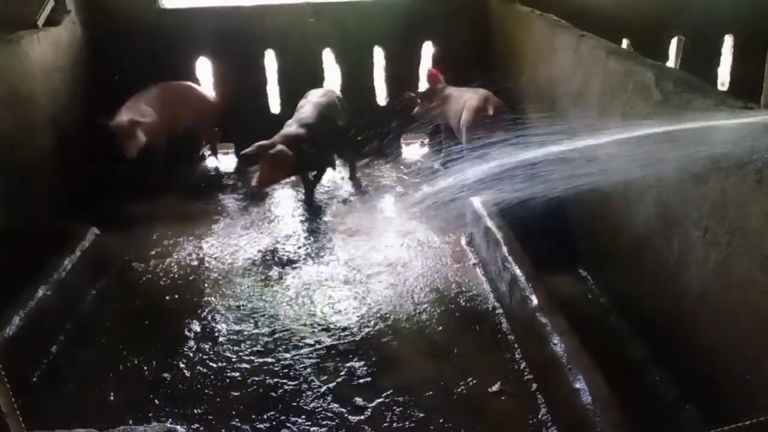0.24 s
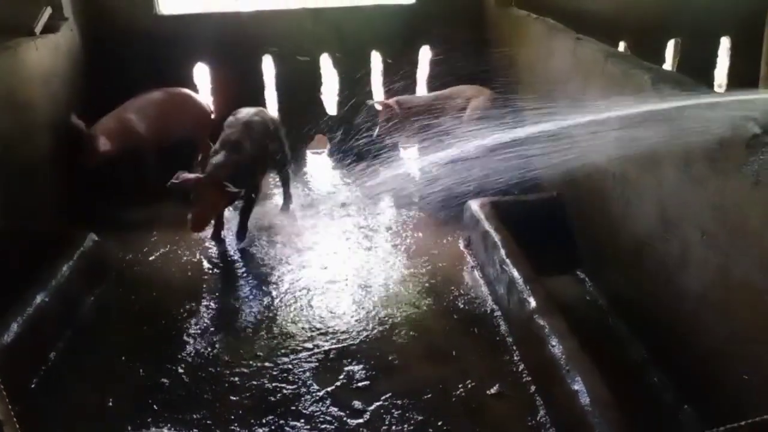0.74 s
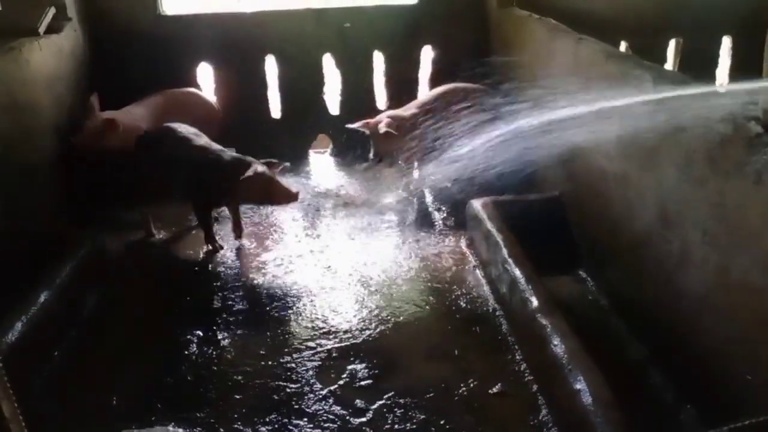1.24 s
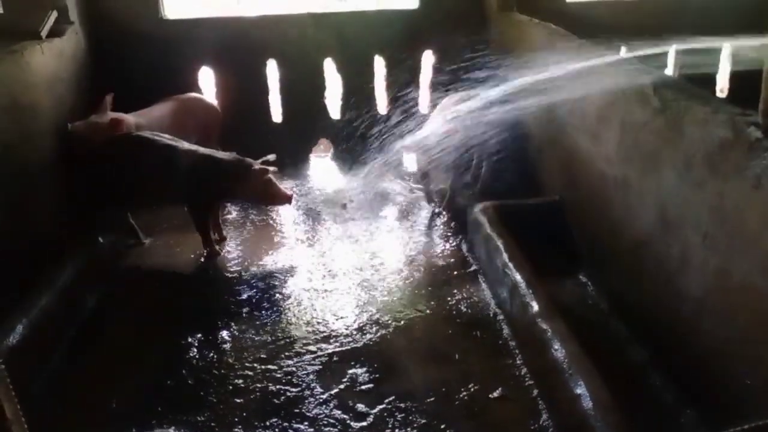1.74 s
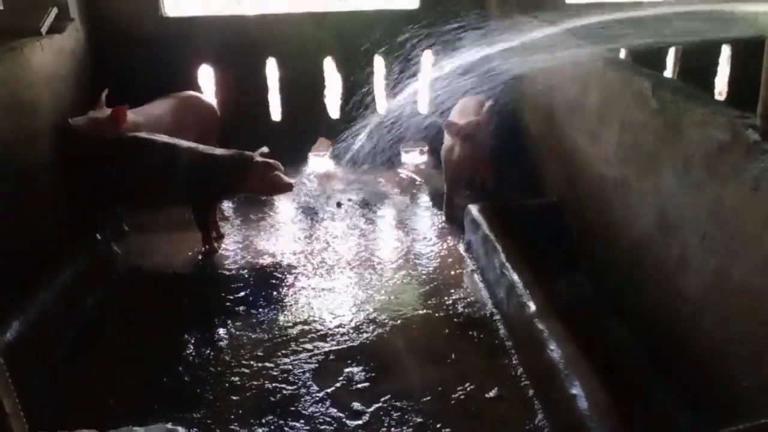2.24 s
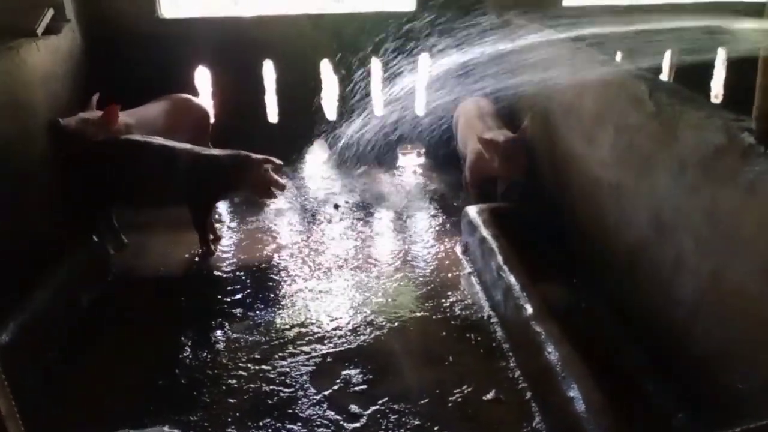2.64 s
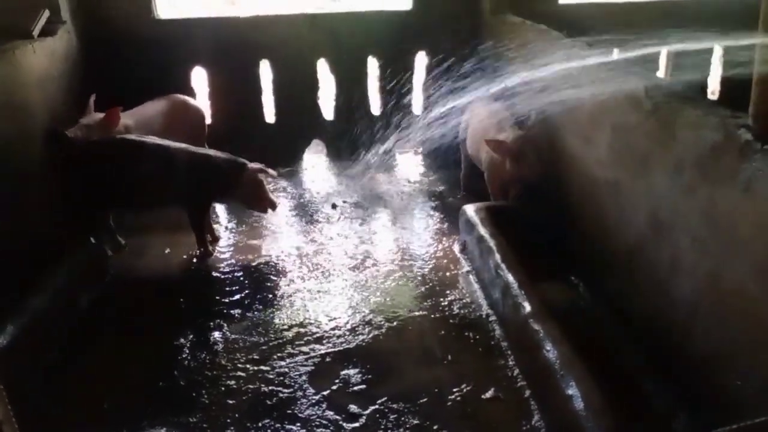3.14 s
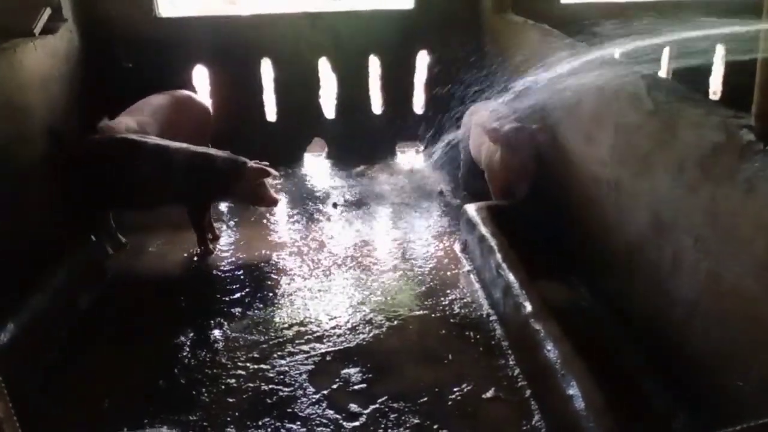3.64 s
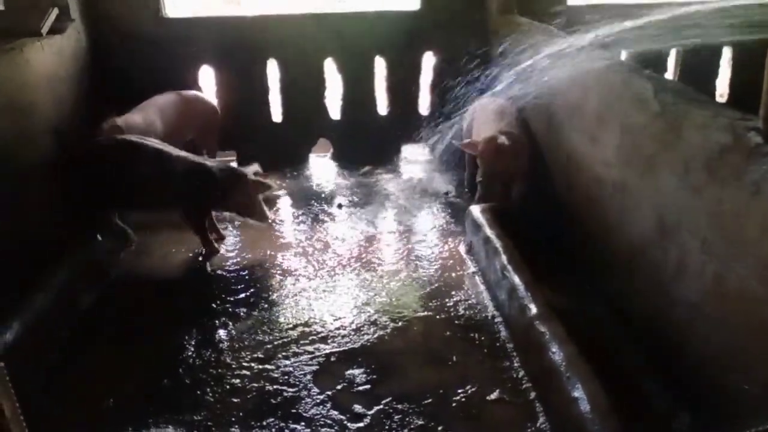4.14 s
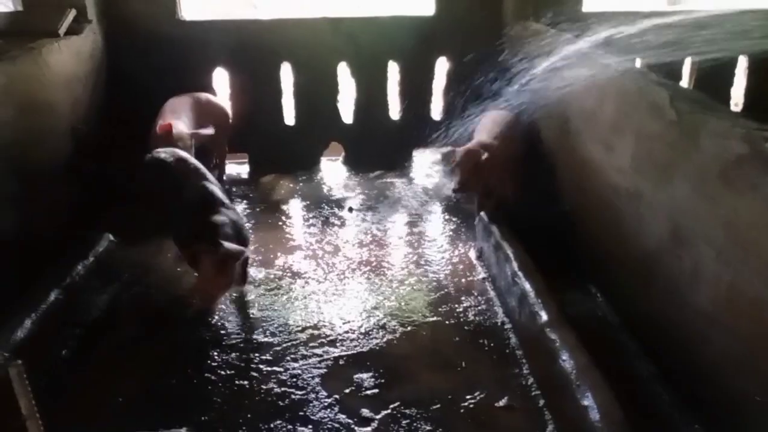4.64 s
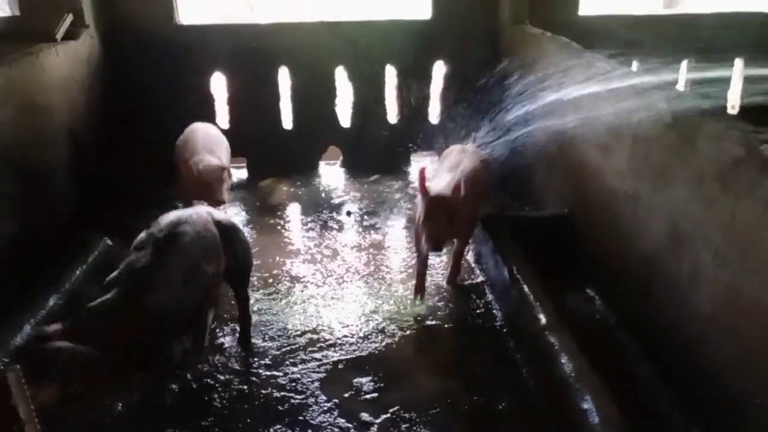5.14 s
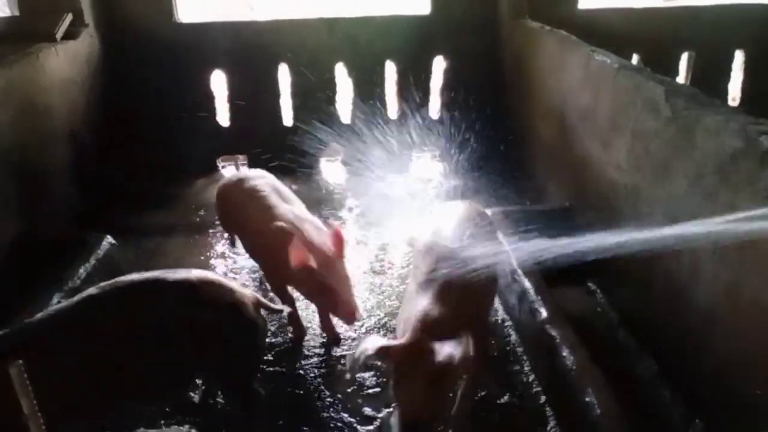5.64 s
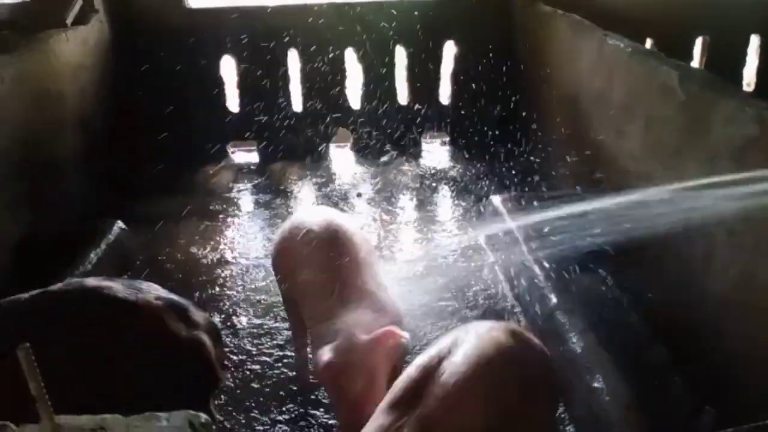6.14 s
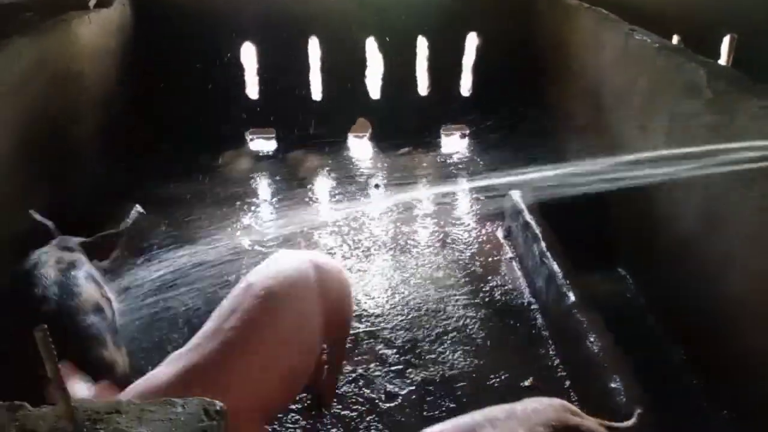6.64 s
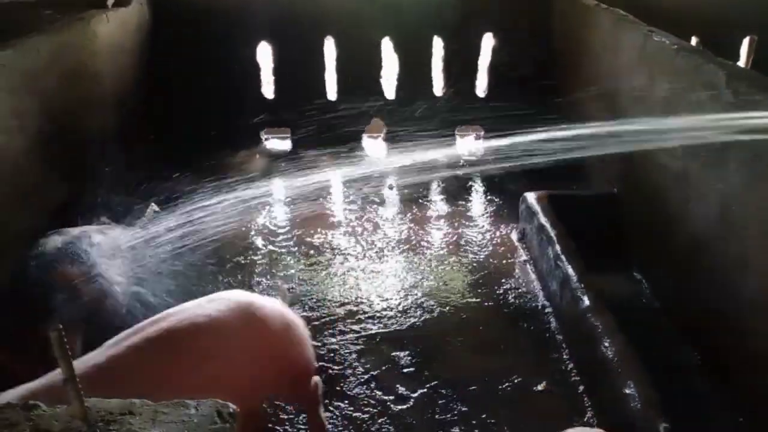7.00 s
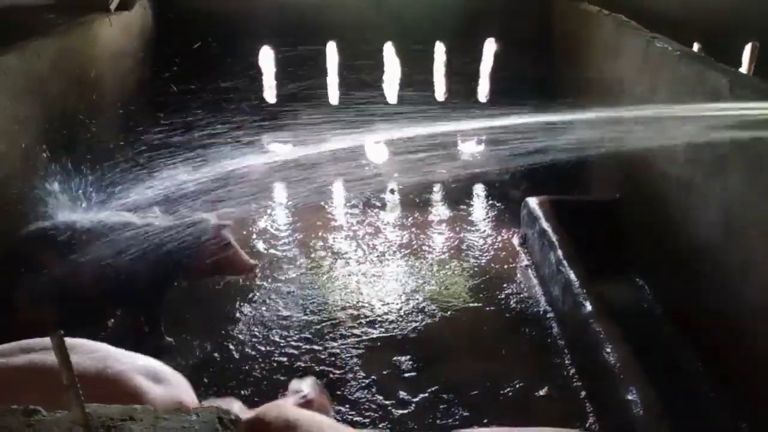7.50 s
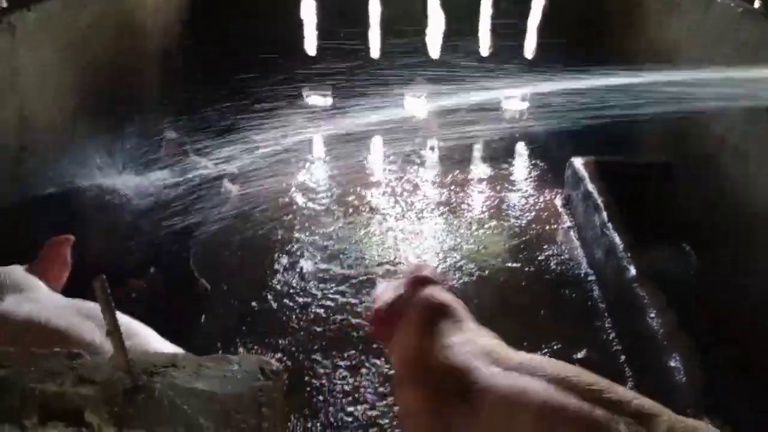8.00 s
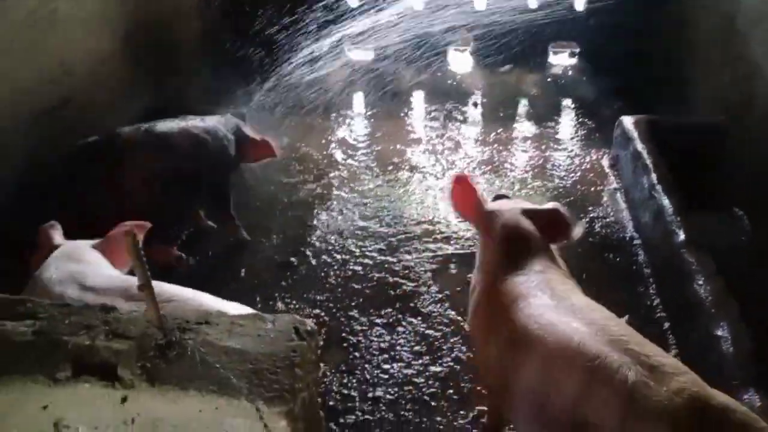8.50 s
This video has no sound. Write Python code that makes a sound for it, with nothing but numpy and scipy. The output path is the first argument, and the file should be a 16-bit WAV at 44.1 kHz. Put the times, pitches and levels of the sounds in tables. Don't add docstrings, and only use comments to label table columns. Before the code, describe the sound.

Steady spraying water on wet concrete, with splashy hoofsteps, dull knocks, two short pig grunts, faint nasal moans and a late burst of wet flapping.

```python
import sys
import numpy as np
from scipy import signal
from scipy.fft import rfft, irfft, next_fast_len
from scipy.io import wavfile
from scipy.ndimage import uniform_filter1d

SR = 44100
rng = np.random.default_rng(int(sys.argv[2]) if len(sys.argv) > 2 else 0)


def unload_audio(sound):
    columns = np.transpose(np.atleast_2d(sound))
    steps = np.round(np.clip(columns, -1, 1) * 32767)
    wavfile.write(sys.argv[1], SR, steps.astype(np.int16))


def volts(x):
    e = np.asarray(x, float) / 20
    return 10 ** e


N = 386316
STEP = 64


def evened(x):
    return x / np.sqrt(np.mean(x ** 2) + 1e-20)


def read(points, hz):
    f, value = np.transpose(points)
    return np.interp(np.log(hz + 1), np.log(f + 1), value)


def played(rows, t):
    s, *columns = np.transpose(rows)
    return [np.interp(t, s, c) for c in columns]


def add(mix, s, sound):
    part = mix[round(s * SR):][:len(sound)]
    part += sound[:len(part)]


def resonate(x, hz, width_hz):
    r = np.exp(-np.pi * width_hz / SR)
    if np.isscalar(hz):
        return 2 * signal.lfilter([1 - r], [1, -r * np.exp(2j * np.pi * hz / SR)], x).real
    turn = np.exp(2j * np.pi * np.cumsum(hz) / SR)
    return 2 * (turn * signal.lfilter([1 - r], [1, -r], x / turn + 1e-18)).real


def coloured(x, spectrum):
    size = next_fast_len(len(x))
    gain = volts(read(spectrum, np.fft.rfftfreq(size, 1 / SR)))
    return irfft(rfft(x, size) * gain, size)[:len(x)]


def lumpy(patchy_db, flicker_db):
    size = 512
    frames = 4 * N // size + 5
    a, b, patches = rng.standard_normal((frames, size // 2 + 1, 3)).T
    patches = evened(uniform_filter1d(uniform_filter1d(patches, size=6, axis=0), size=12, axis=1))
    gusts = signal.lfilter([1], [1, -0.8], rng.exponential(1, frames) ** 1.16)
    gusts = evened(gusts - gusts.mean()).clip(-3, 4)
    z = (a + 1j * b) * volts(patchy_db * patches + flicker_db * gusts)
    return evened(signal.istft(z, nperseg=size, noverlap=3 * size // 4)[1][:N])


def drops(per_s, spread_db):
    chance, size = rng.random((N, 2)).T
    sign = np.sign(rng.standard_normal(N))
    strength = volts(spread_db * np.minimum(-np.log(size + 1e-9), 4))
    return evened((chance < per_s / SR) * sign * strength)


def peaked(t, s, rise_s, fall_s):
    return np.where(t < s, (s - t) / rise_s, (t - s) / fall_s)


def jet(t):
    # time in seconds, force of the jet in dB,
    # depth of the water it lands in and fineness of the nozzle spray, both in dB over the force.
    aim = [(0.0, -26.5, -7.5, -5.5), (1.1, -24, -5, -9.5), (1.3, -25.5, -8, -6.5), (1.85, -27, -7, -7.5),
           (2.0, -30, 5, -5), (2.35, -28, 0.5, -7), (2.8, -27, 3.5, -6.5), (3.44, -27, -1.5, -8.5),
           (3.85, -27.5, -1, -6.5), (4.3, -30.5, 5, -5.5), (4.8, -22, -7, -7.5), (5.28, -22, -6.5, -10.5),
           (5.4, -21.5, -8, -6), (5.8, -19.5, -7.5, -7), (6.0, -25.7, -8.5, -6), (7.6, -25.2, -9.5, -7.5),
           (7.9, -23, -4, -8), (8.76, -28, -8, -7)]
    # quietest moment in seconds, loss in dB, fading in seconds.
    crossings = [(0.72, -4, 0.05), (2.43, -3, 0.12), (5.92, -9, 0.12), (6.305, -11, 0.2), (6.7, -4, 0.35),
                 (7.58, -7, 0.2), (7.71, -8, 0.2), (8.165, -9, 0.08), (8.385, -10, 0.17), (8.46, -4, 0.06),
                 (8.635, -3, 0.08)]
    # time in seconds, gain of fine
    # and of heavy drops in dB.
    spurts = [(0.62, 1.5, -1), (2.46, 1.5, 1), (5.34, 3, 1.5), (6.73, 4, 0), (6.85, 2.5, 0), (7.8, 3, -3),
              (8.0, 3, 5), (8.095, -2, 8), (8.19, 1, 6), (8.49, 0, 6), (8.54, 0, 4), (8.655, 5, 9)]
    return_s, rise_s, fade_s = 0.03, 0.01, 0.06
    mist_share, splatter_share = 0.9, 0.7
    force_db, depth_db, nozzle_db = played(aim, t)
    loss_db = sum(db * np.maximum(1 - peaked(t, s, fading_s, return_s), 0) for s, db, fading_s in crossings)
    fine_db, heavy_db = sum(np.outer(db, np.maximum(1 - peaked(t, s, rise_s, fade_s), 0))
                            for s, *db in spurts)
    fizz_db = force_db + loss_db + fine_db
    splatter_db = force_db + depth_db + splatter_share * loss_db + heavy_db
    mist_db = force_db + nozzle_db + mist_share * (loss_db + fine_db)
    return fizz_db, splatter_db, mist_db


def spray():
    # frequency in Hz, density in dB per Hz.
    fizz_spectrum = [(1760, -29), (3000, -7), (4440, -0.5), (5220, -2), (6050, 1), (6740, 2.5), (7040, 1),
                     (9290, -21), (11000, -21.5), (14300, -47), (22000, -120)]
    splatter_spectrum = [(350, -45), (900, -15), (1500, -4), (2500, -2.5), (3600, 2), (4800, -8), (7000, 0),
                         (9000, -34)]
    mist_spectrum = [(8000, -48), (9300, -34), (11400, -11.5), (12700, 2.5), (14500, 6.5), (15500, 5.5)]
    t, slow = np.arange(N) / SR, np.arange(0, N, STEP) / SR
    fizz, splatter, mist = (np.interp(t, slow, volts(db)) for db in jet(slow))
    water = lumpy(patchy_db=2.0, flicker_db=1.5) + 0.72 * drops(per_s=2500, spread_db=2.5)
    heavy = lumpy(patchy_db=2.17, flicker_db=1.67) + 0.37 * drops(per_s=1200, spread_db=0.5)
    fine = fizz * evened(coloured(water, fizz_spectrum)) + mist * evened(coloured(water, mist_spectrum))
    return fine + splatter * evened(coloured(heavy, splatter_spectrum))


def swells(rows, rise_share, t):
    return np.array([volts(db - 20 * peaked(t, s, rise_share * dying_s, dying_s)) ** 2
                     for s, db, dying_s, *_ in rows])


def wading():
    # peak in seconds, rumble in dB, time to die 20 dB in seconds.
    heaves = [(0.69, -55, .1), (0.77, -45, .11), (0.95, -49, .1), (1.12, -57, .1), (1.47, -59, .1),
              (1.72, -49, .3), (1.96, -35, .22), (2.66, -53, .15), (3.34, -58, .1), (3.58, -55, .15),
              (3.74, -42, .2), (3.94, -43, .2), (4.1, -53, .1), (4.53, -56, .15), (4.78, -35, .14),
              (4.97, -45, .12), (5.17, -46, .12), (5.34, -50, .15), (5.61, -50, .25), (5.98, -37, .13),
              (6.62, -53, .25), (6.79, -53, .15), (7.1, -54, .2), (7.3, -55, .12), (7.85, -45, .12),
              (8.1, -50, .25), (8.68, -49, .25)]
    # peak in seconds, thud in dB, time to die 20 dB in seconds.
    treads = [(1.66, -55, .12), (2.37, -52, .1), (3.8, -37, .4), (4.1, -44, .25), (4.27, -46, .2),
              (4.6, -48, .2), (4.9, -52, .15), (5.22, -42, .25), (5.45, -44, .25), (5.7, -46, .25),
              (5.9, -47, .2), (6.07, -47, .15), (6.66, -45, .3), (6.98, -45, .35), (7.9, -39, .25),
              (8.12, -38, .15), (8.68, -41, .25)]
    # peak in seconds, slosh in dB, time to die 20 dB in seconds, pitch in Hz.
    sloshes = [(0.35, -47, .5, 850), (0.76, -33, .24, 937), (1.52, -49, .25, 820), (1.97, -36, .12, 1000),
               (2.12, -37, .12, 1400), (2.24, -32, .12, 1200), (2.29, -35, .08, 850), (2.35, -37, .14, 700),
               (2.74, -41, .12, 1000), (3.35, -45, .15, 950), (3.55, -38, .15, 900),
               (3.735, -24, .14, 1150), (3.85, -35, .35, 950), (4.27, -37, .2, 1000), (4.45, -40, .25, 980),
               (4.4, -38, .1, 1550), (4.9, -41, .5, 950), (5.26, -37.5, .2, 705), (5.56, -41, .3, 880),
               (5.78, -43, .15, 850), (6.0, -37, .2, 557), (6.28, -47, .4, 950), (6.9, -44, .2, 980),
               (7.16, -41, .35, 950), (7.86, -32, .22, 780), (8.135, -25, .12, 640),
               (8.045, -31, .08, 1200), (8.24, -36, .14, 800), (8.42, -54, .2, 1130),
               (8.67, -33, .05, 1200)]
    rise_shares = [0.7, 0.5, 0.5]
    # rumble in dB, thuds in dB, slosh in dB over the splatter.
    still_db = [-76, -75, -25]
    still_hz = 950
    # frequency in Hz, density in dB per Hz.
    rumble_spectrum = [(25, -43), (50, -16.5), (90, -1), (125, -7), (170, -25), (300, -50)]
    thud_spectrum = [(90, -60), (160, -12), (215, -4), (260, -10.5), (420, -13.5), (550, -15), (900, -33)]

    t, slow = np.arange(N) / SR, np.arange(0, N, STEP) / SR
    heave, tread, slosh = (swells(rows, share, slow)
                           for rows, share in zip((heaves, treads, sloshes), rise_shares))
    trickle = volts(still_db[2] + jet(slow)[1]) ** 2
    hz = (np.transpose(sloshes)[3] @ slosh + still_hz * trickle) / (slosh.sum(0) + trickle)
    hz = np.interp(t, slow, hz)
    powers = (heave.sum(0) + volts(still_db[0]) ** 2, tread.sum(0) + volts(still_db[1]) ** 2,
              slosh.sum(0) + trickle)
    rumble, thud, wave = (np.interp(t, slow, np.sqrt(p)) for p in powers)
    churn = lumpy(patchy_db=2.5, flicker_db=2.26)
    low = rumble * evened(coloured(churn, rumble_spectrum)) + thud * evened(coloured(churn, thud_spectrum))
    return low + wave * evened(resonate(resonate(churn, hz, 230), hz, 390))


def pump():
    # frequency in Hz, level in dB.
    lines = [(887, -53), (1125, -65.5), (1394, -48.5), (1674, -52), (1895, -54), (1927, -54.5), (2008, -51),
             (2476, -49), (2530, -48)]
    wander_hz, flutter_db = 7, 2.5
    at, slow = np.arange(N), np.arange(0, N, STEP)
    wander, flutter = (evened(uniform_filter1d(v, size=24))
                       for v in rng.standard_normal((2, len(lines), len(slow))))
    out = np.zeros(N)
    for (hz, db), bend, throb in zip(lines, wander, flutter):
        turns = np.cumsum(hz + wander_hz * bend) * STEP / SR
        level = np.interp(at, slow, volts(db + 3 + flutter_db * throb))
        out += level * np.sin(2 * np.pi * np.interp(at, slow, turns))
    return out


def burst(t60_s, rise_s, smack=1.2, click=5.2):
    t = np.arange(round(SR * min(t60_s, .5) * .8)) / SR
    dying = volts(-60 * t / t60_s) + smack * volts(-60 * t / .03)
    shape = (1 - np.exp(-t / rise_s)) * dying
    water = shape / shape.max() * rng.standard_normal(SR // 2)[:len(t)]
    return water + click * signal.unit_impulse(len(t))


def slap(db, hz, hollow_db, t60_s):
    water = burst(t60_s, rise_s=0.0007, smack=1.1, click=4.5)
    bright = np.diff(water, prepend=0) * SR / (2 * np.pi * hz)
    ring = 4.6 * resonate(resonate(bright, hz, 750), hz, 1400)
    hollow = 11.1 * volts(hollow_db) * resonate(resonate(water, 1100, 470), 980, 640)
    splash = resonate(resonate(bright, 3300, 3300), 3300, 3300)
    return volts(db - 15) * (ring + hollow + 0.45 * splash)


def thump(db, hz, t60_s):
    knock = burst(t60_s, rise_s=0.0013)
    return volts(db + 20) * resonate(resonate(knock, hz, 62), hz, 240)


def grunt(rows, throat, breath, per_s):
    t = np.arange(rows[0][0], rows[-1][0], 1 / SR)
    chest_db, mouth_db, top_db = played(rows, t)
    turns = (t - t[0]) * per_s
    pulses = np.diff(np.floor(turns), prepend=-1) * 40
    puffs = np.exp(-(turns % 1) / .35) * rng.standard_normal(len(t))
    voice = pulses + breath * puffs
    rasp = 1.7 * rng.standard_normal(len(t))

    def ring(x, hz, width_hz, db):
        return volts(db) * evened(resonate(resonate(x, hz, width_hz + 25), hz, 400))

    chest = sum(ring(voice + rasp, *row) for row in throat if row[0] < 1000)
    *mouth, top = (ring(voice, *row) for row in throat if row[0] > 1000)
    scale = volts(mouth_db) / np.std(sum(mouth) + top)
    both = volts(chest_db) * evened(chest) + scale * (sum(mouth) + volts(top_db) * top)
    return both * signal.windows.tukey(len(t), .02)


def moan(rows):
    width_hz, octave_db = 70, -8
    t = np.arange(rows[0][0], rows[-1][0], 1 / SR)
    level_db, hz = played(rows, t)
    air = rng.standard_normal(len(t))
    low, high = (evened(resonate(resonate(air, k * hz, width_hz), k * hz, 2 * width_hz)) for k in (1, 2))
    return volts(level_db) * (low + volts(octave_db) * high) * signal.windows.tukey(len(t), .15)


def flap(db, hz, low_db, t60_s):
    water = burst(t60_s, rise_s=0.0004, smack=1.4, click=7)
    clap = 6.6 * resonate(water, hz, 500)
    boom = 7.4 * volts(low_db) * resonate(resonate(water, 370, 276), 540, 500)
    spatter = 0.87 * resonate(water, 2400, 2300)
    return volts(db - 17.5) * (clap + boom + spatter)


def pen(x):
    # frequency in Hz, time to die 60 dB in seconds.
    t60 = [(200, 0.2), (1000, 0.52), (4000, 0.18), (12000, 0.46)]
    taps = np.zeros(SR // 2)
    at = np.arange(300, len(taps) - 20, 20)
    taps[at + rng.integers(0, 20, len(at))] = rng.choice([-1., 1.], len(at))
    hz, t, z = signal.stft(taps, SR, nperseg=256)
    tail = signal.istft(z * volts(-60 * t / read(t60, hz)[:, None]), SR, nperseg=256)[1]
    return signal.fftconvolve(x, tail / np.linalg.norm(tail))[:N]


def scene():
    # start
    # in seconds, peak in dB, ring in Hz.
    slaps = [(0.885, -2, 3300), (0.906, -9, 3500), (1.018, -6, 4000), (1.108, -11, 4240), (1.129, -8, 3570),
             (1.832, -9, 3580), (1.854, -12, 2700), (2.189, -10.5, 2100), (2.695, -10, 3880),
             (2.853, -8, 2900), (2.983, -5, 3290), (3.081, -9, 3530), (4.127, -10.5, 1590),
             (4.192, -5, 1350), (4.244, -7, 2800), (5.239, -9, 4170), (5.277, -4.5, 3700),
             (5.412, -5, 4400), (5.494, -5.5, 3970), (5.655, -12, 4060), (5.723, -8, 3730),
             (7.001, -6.5, 3700), (8.486, -13, 3140),
             (0.252, -13, 3700), (0.885, -13, 1700), (0.944, -12, 3800), (0.985, -13, 3890),
             (1.02, -14, 2000), (1.628, -16, 3380), (2.277, -11, 3810), (2.451, -10, 3100),
             (2.458, -14, 1700), (2.51, -15, 1450), (2.631, -13, 3800), (2.71, -12, 1550),
             (2.73, -12, 3900), (2.818, -11, 3610), (2.893, -12, 3700), (3.296, -13, 3750),
             (3.44, -16, 3460), (3.502, -16, 4140), (4.176, -14, 3810), (4.377, -11, 2700),
             (4.42, -11, 2800), (4.432, -11, 2600), (4.476, -12, 3200), (4.905, -11, 3570),
             (5.056, -13, 3650), (5.612, -12, 4500), (6.316, -17, 4290), (6.769, -13, 3730),
             (6.874, -16, 4360), (8.087, -5, 2800), (8.11, -10, 2800), (8.2, -8, 3500), (8.462, -14, 3600),
             (8.57, -14, 3600)]
    # start in seconds, peak in dB, ring in Hz,
    # hollow ring in dB relative, time to die 60 dB in seconds.
    plunges = [(0.737, -13, 4270, -11, 0.18), (1.497, -10, 2650, -19.5, 0.27),
               (2.546, -10, 4020, -10, 0.11), (3.661, -3, 2600, -3, 0.26), (3.704, -16, 3850, -7, 0.18),
               (3.721, -3, 3250, -8, 0.22), (4.034, -8, 3000, -9, 0.23), (4.386, -4.5, 2560, -17, 0.42),
               (4.401, -10.5, 3950, -7, 0.39), (4.622, -16, 4080, -6, 0.18), (8.648, -10, 3800, -7.5, 0.26),
               (8.687, -2.5, 3600, -13, 0.28)]
    # start in seconds, peak in dB, ring in Hz.
    thumps = [(0.73, -32, 479), (2.391, -44, 217), (2.598, -40, 213), (2.659, -47, 231), (2.918, -54, 204),
              (3.54, -39.5, 400), (3.718, -24, 346), (3.96, -34, 280), (4.289, -42, 222), (4.519, -42, 374),
              (4.776, -26, 260), (5.159, -38, 277), (5.279, -36, 229), (5.629, -31, 294), (6.167, -43, 486),
              (6.629, -40, 520), (6.697, -35, 207), (6.97, -38, 228), (7.715, -29, 286), (8.652, -27, 240)]
    # time in seconds, chest effort in dB, mouth effort in dB,
    # gain of the top resonance in dB.
    grunts = [
        [(1.8752, -50, -46, -6), (1.9, -42, -40, -6), (1.935, -35, -25.5, 0), (1.965, -26, -20, 0),
         (1.99, -33, -24, 0), (2.006, -30, -21, -10), (2.03, -27, -36, -10), (2.05, -35, -44, -6),
         (2.1, -47, -48, -6)],
        [(5.892, -38, -48, -8), (5.925, -32, -40, -8), (5.958, -26, -28, -8), (5.985, -23, -26, 9),
         (6.0, -24.5, -32, 0), (6.03, -29, -33, 0), (6.07, -35, -35, 1), (6.14, -52, -46, 0)],
    ]
    # resonance in Hz, width in Hz, level in dB.
    throats = [
        [(170, 46, -5), (275, 40, 0), (560, 120, -9), (870, 60, -9), (1770, 90, -2.5), (2920, 90, -1.5),
         (3450, 120, 2)],
        [(220, 40, 0), (406, 40, 1), (605, 70, -8), (804, 36, -15), (1390, 70, -3), (1600, 110, -1.5),
         (2054, 64, -2.5)],
    ]
    breathy = [1.1, 3.2]
    pulses_per_s = [46.9, 46.9]
    # time in seconds, level in dB, pitch in Hz.
    moans = [
        [(6.61, -52, 716), (6.64, -49, 740), (6.685, -39, 870), (6.74, -43, 860), (6.78, -55, 860)],
        [(7.3, -56, 822), (7.35, -40, 840), (7.42, -39, 830), (7.46, -51, 800), (7.592, -47, 740),
         (7.68, -54, 787)],
        [(8.34, -56, 1170), (8.43, -46, 1160), (8.47, -42, 1160), (8.5, -48, 1150), (8.56, -58, 1140)],
    ]
    # start in seconds, peak in dB, ring in Hz,
    # low cavity in dB relative, time to die 60 dB in seconds.
    flaps = [
        (7.733, -6, 850, -12, 0.54),
        (7.817, -1.5, 800, -1, 0.36),
        (7.904, -6, 1440, -11, 0.19),
        (7.996, 0, 1120, -16, 0.26),
        (8.087, -1.5, 1200, 4, 0.46),
        (8.182, -5, 1300, -6, 0.18),
    ]
    # frequency in Hz, gain in dB.
    microphone = [(40, -22), (150, 3.5), (300, -0.5), (7000, 0.5), (9300, -22), (11400, -22), (13000, -14),
                  (15500, -12)]

    water = spray() + wading() + volts(-0.5) * pump()
    pigs = np.zeros(N)
    for s, *row in slaps:
        add(pigs, s, slap(*row, hollow_db=-30, t60_s=0.19))
    for s, *row in plunges:
        add(pigs, s, slap(*row))
    for s, *row in thumps:
        add(pigs, s, thump(*row, t60_s=0.24))
    for rows, *voice in zip(grunts, throats, breathy, pulses_per_s):
        add(pigs, rows[0][0], grunt(rows, *voice))
    for rows in moans:
        add(pigs, rows[0][0], moan(rows))
    for s, *row in flaps:
        add(pigs, s, flap(*row))
    mono = coloured(pigs + volts(-3.5) * pen(pigs), microphone) + water
    return np.array([mono, mono])


def top_cut(x):
    return signal.sosfilt(signal.butter(12, 16840, fs=SR, output="sos"), x)


def record(dry):
    # frequency in Hz, threshold in dB.
    suppressed = [(300, -100), (500, -70), (900, -57), (1300, -62), (2200, -58), (3000, -100)]
    # frequency in Hz, density in dB per Hz.
    hush_spectrum = [(15, -49), (25, -15), (96, -33), (425, -36), (583, 2), (763, -9), (860, 22),
                     (900, -19), (1170, -45), (1980, -120)]
    hush_db, edge_hz = -71, 15500
    hz, t, z = signal.stft(dry[0], SR, nperseg=512, noverlap=384)
    power = uniform_filter1d(uniform_filter1d(abs(z) ** 2, size=3, axis=0), size=7, axis=1)
    under_db = read(suppressed, hz)[:, None] - 10 * np.log10(abs(power) + 1e-14)
    duck_db = -14 * (.5 + .5 * np.tanh(under_db / 3))
    kept = signal.istft(z * volts(duck_db), SR, nperseg=512, noverlap=384)[1][:N]
    kept = kept + volts(hush_db) * evened(coloured(rng.standard_normal(N), hush_spectrum))
    low_pass = signal.firwin(3001, edge_hz, window=("kaiser", 10), fs=SR)
    kept = signal.oaconvolve(kept, low_pass, "same")
    return top_cut(np.array([kept, kept]))


dry = scene()
out = record(dry)
unload_audio(out)
```